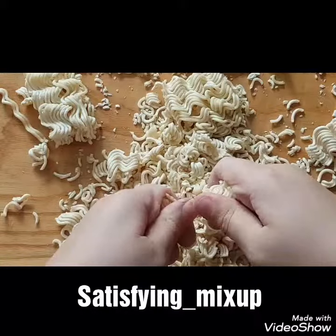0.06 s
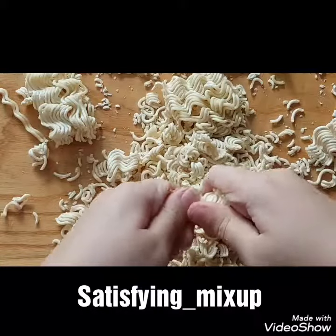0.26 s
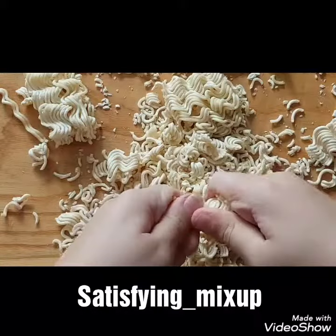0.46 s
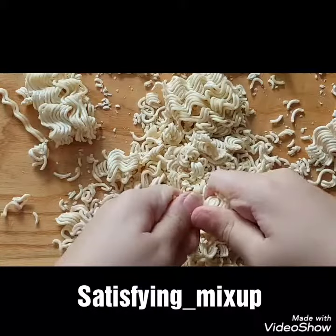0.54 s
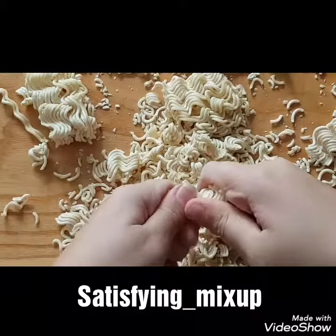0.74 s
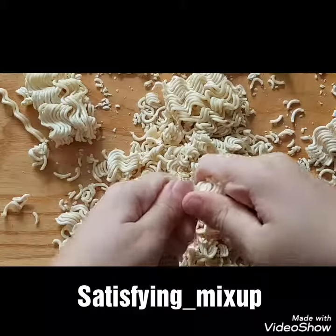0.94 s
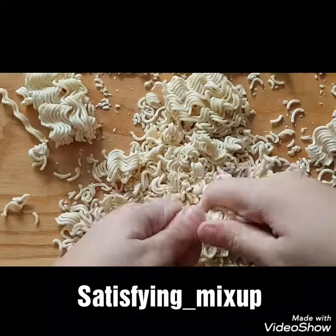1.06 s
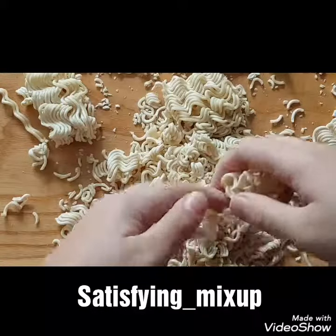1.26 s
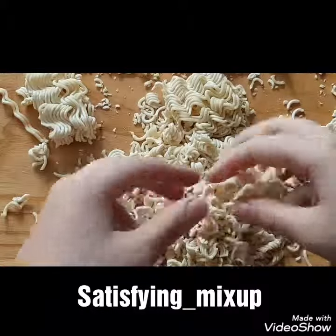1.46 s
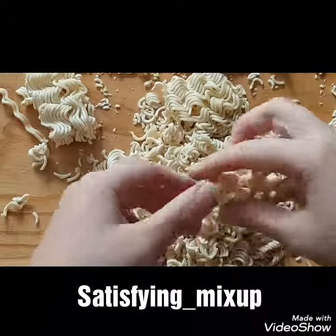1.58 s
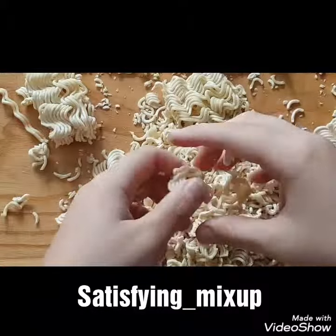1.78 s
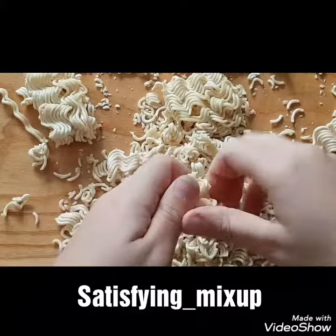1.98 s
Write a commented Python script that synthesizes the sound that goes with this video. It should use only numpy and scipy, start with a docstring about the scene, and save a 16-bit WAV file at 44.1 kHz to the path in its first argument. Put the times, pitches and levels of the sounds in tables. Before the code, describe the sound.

Brittle noodle fractures, bright and clicky with tiny splinters, start with a strong snap and thin out before the first second ends; later fingers rummage in the crumb heap with soft hollow scrapes, close and dry indoors.

```python
"""Dry noodle snaps and crumbs

Fingers snap a piece of dry instant noodle close to a phone, then rummage in the crumbs on a wooden table.
Each fracture is a click that rings briefly, mostly near 3 kHz, and sheds a noise burst of splinters.
Damped sines are thuds of the hands; touches on the heap are scrapes with a low hollow ring.
Random ticks and pings make the rustle; a small quiet room adds a faint tail, low rumble and hiss."""
import sys
import numpy as np
from scipy import signal
from scipy.fft import rfft, irfft
from scipy.io import wavfile

SR = 44100
rng = np.random.default_rng(int(sys.argv[2]) if len(sys.argv) > 2 else 0)


def pcm_store(signal):
    """Save signal as 16-bit PCM."""
    levels = np.round(np.clip(np.atleast_2d(signal), -1, 1) * 32767)
    wavfile.write(sys.argv[1], SR, levels.astype(np.int16).T)


N = 88200  # 2 s
T = np.arange(N) / SR  # s
HZ = np.maximum(np.arange(N // 2 + 1) * SR / N, 1e-3)  # kept above zero for the logarithm


def undb(db):
    """Decibels to gain."""
    return 10 ** (np.asarray(db) / 20)


def unit(x):
    """Scale to a peak of one."""
    return x / np.abs(x).max()


def colour(x, points):
    """Minimum-phase filter of unit power through (f/Hz, level/dB) points."""
    hz, db = np.array(points, float).T
    gain = undb(np.interp(np.log(HZ), np.log(hz), db))
    gain = gain / np.sqrt(np.mean(gain ** 2))
    # Folding the cepstrum onto positive times makes the filter causal
    cepstrum = irfft(np.log(gain), N)
    cepstrum[1:N // 2] *= 2
    cepstrum[N // 2 + 1:] = 0
    impulse = irfft(np.exp(rfft(cepstrum)), N)[:N // 10]
    return signal.fftconvolve(x, impulse)[:N]


def lowpass(x, hz, order):
    """Butterworth low-pass."""
    return signal.sosfilt(signal.butter(order, hz, fs=SR, output="sos"), x)


def resonate(x, hz, q):
    """One resonance, gain 1 at its centre."""
    return signal.lfilter(*signal.iirpeak(hz, q, fs=SR), x)


def add(out, s, x):
    """Mix a sound in at a time in seconds."""
    i = int(round(s * SR))
    out[i:i + len(x)] += x[:N - i]


def burst(decay_s, spread, size):
    """A quickly swelling, then dying run of uneven micro-cracks with a steady total energy."""
    t = T[:size]
    noise, sizes = rng.standard_normal((2, size))
    fade = np.exp(-t / decay_s)
    rise = 1 - np.exp(-t / (0.12 * decay_s))
    cracks = noise * np.exp(spread * sizes) * fade * rise
    return cracks * np.sqrt(np.sum(fade ** 2) / np.sum(cracks ** 2)) / 2


# Spectrum of the room's rumble and hiss: f/Hz, relative level/dB per Hz
FLOOR_SPECTRUM = [(20, -1), (40, -10), (70, -3.5), (100, 0), (140, -5.5), (300, -7.5), (600, -16.5),
                  (1200, -19.5), (3000, -29), (4400, -34), (5500, -33.5), (13000, -41), (16000, -45.5)]
FLOOR_DB, FLOOR_SIDE_DB = -70.5, -19.5  # side is relative to mid


def room_floor():
    """Low rumble and hiss: shaped noise in the middle, plus a weaker one in opposite phase left and right."""
    mid = undb(FLOOR_DB) * colour(rng.standard_normal(N), FLOOR_SPECTRUM)
    side = undb(FLOOR_DB) * colour(rng.standard_normal(N), FLOOR_SPECTRUM)
    return mid + undb(FLOOR_SIDE_DB) * side * np.array([[1], [-1]])


# Spectrum of the room's tail: f/Hz, relative level/dB
ROOM_SPECTRUM = [(100, -3), (500, -6.5), (2000, 2.5), (3000, 1.5), (4300, 0), (5500, -1), (7500, -0.5),
                 (15000, 6)]
ROOM_DB, ROOM_T60_S, ROOM_DELAY_S = -24.5, 0.31, 0.0026


def room(x):
    """A weak, short diffuse tail: the sound convolved with dying noise."""
    decay = np.exp(-np.log(1000) * T / ROOM_T60_S)  # 60 dB down after the T60
    tail = rng.standard_normal(N) * decay * (T > ROOM_DELAY_S)
    tail = colour(tail / np.sqrt(np.sum(tail ** 2)), ROOM_SPECTRUM)
    return undb(ROOM_DB) * signal.fftconvolve(x, tail)[:N]


# Loudness of the crumbs rubbing between the fingers: t/s, level/dB
RUSTLE_LEVEL = [(0, -77.5), (.07, -80), (.11, -68.5), (.14, -87), (.208, -100), (.222, -54.5), (.26, -58),
                (.31, -73), (.40, -78.5), (.435, -63.5), (.48, -73), (.525, -82), (.548, -72), (.61, -86),
                (.90, -77.5), (.98, -82.5), (1.13, -77), (1.20, -71.5), (1.245, -73), (1.29, -74.5),
                (1.33, -69.5), (1.44, -87.5), (1.48, -64), (1.60, -72), (1.70, -70.5), (1.78, -85.5),
                (1.85, -75), (1.91, -83.5), (1.94, -74.5), (2, -67)]
# Spectrum of the dry crumb ticks: f/Hz, relative level/dB
TICK_SPECTRUM = [(150, -4), (400, 5.5), (1000, 2), (1800, -3), (3000, 1), (4300, -3.5), (5500, -9),
                 (7500, -7.5), (13000, -11), (16000, -18.5)]
TICKS_PER_S, PINGS_PER_S = 3000, 260  # average rates
PING_DB, PING_SPREAD_DB = 5, 6  # relative to the ticks
PING_HZ, PING_SPREAD_OCTAVES, PING_FADE_CYCLES = 3015, 0.335, 3


def rustle(size=512):
    """Crumbs between the fingers: dense dry ticks, and loose bits that each ping at their own pitch."""
    ticks = (rng.random(N) < TICKS_PER_S / SR) * rng.standard_normal(N)
    ticks = colour(ticks / ticks.std(), TICK_SPECTRUM)
    pings = np.zeros(N)
    starts = np.flatnonzero(rng.random(N) < PINGS_PER_S / SR)
    variations = np.clip(rng.standard_normal((len(starts), 2)), -2, 2)
    for i, (pitch, strength) in zip(starts, variations):
        cycles = PING_HZ * 2 ** (PING_SPREAD_OCTAVES * pitch) * T[:size]
        envelope = np.exp(-cycles / PING_FADE_CYCLES) * (1 - np.exp(-cycles))
        ping = np.sin(2 * np.pi * cycles) * envelope
        add(pings, i / SR, undb(PING_DB + PING_SPREAD_DB * strength) * ping)
    level_db = np.interp(T, *np.array(RUSTLE_LEVEL).T)
    return (ticks + pings) * undb(level_db)


# Touches on the heap: t/s, hollow ring level/dB, scrape level/dB, crumb pitch f/Hz
TOUCHES_ON_HEAP = [(1.358, -65, -64.5, 2400), (1.394, -54.5, -50, 3400), (1.4591, -44.5, -42, 3870),
                   (1.4643, -65.5, -46.5, 3700), (1.482, -49, -45, 3500), (1.504, -50, -65, 2600),
                   (1.5298, -48, -49, 2430), (1.544, -49, -62, 2500), (1.602, -56.5, -54, 2970),
                   (1.637, -54.5, -62, 2750), (1.669, -65.5, -52.5, 2800), (1.682, -51.5, -64.5, 2500),
                   (1.724, -56.5, -58, 3060), (1.850, -61.5, -61, 3000), (1.8865, -49.5, -50.5, 3990),
                   (1.926, -42.5, -43, 3000), (1.9338, -54.5, -43.5, 2130), (1.969, -49.5, -51, 3300),
                   (1.990, -50.5, -60, 2520)]
# Modes of the low hollow ring: f/Hz, relative level/dB, T60 t/s
HOLLOW_MODES = [(257, -11, 0.089), (316.5, 0, 0.16), (458, -14, 0.12), (511, -12, 0.056), (796, -9, 0.038)]
# Spectrum of the scrapes: f/Hz, relative level/dB
SCRAPE_SPECTRUM = [(60, -20.5), (250, 4), (500, 7.5), (1300, -3.5), (2400, 0.5), (3900, -4), (5500, -8),
                   (7500, -5), (13000, -14.5), (16000, -23)]
HOLLOW_ATTACK_S = 0.0017
SCRAPE_DECAY_S, SCRAPE_SPREAD = 0.0034, 0.58  # spread: unevenness of the micro-cracks
CRUMB_RING_DB, CRUMB_RING_Q = 6.5, 9  # gain relative to the scrape


def touches(size=2048):
    """Fingers bump the heap: a short scrape that rings one crumb, and a low hollow ring."""
    out, scrapes = np.zeros((2, N))
    t = T[:N // 4]
    hollow = np.zeros(len(t))
    for hz, db, t60_s in HOLLOW_MODES:
        decay = np.exp(-np.log(1000) * t / t60_s)
        hollow += undb(db) * np.sin(2 * np.pi * hz * t) * decay
    hollow *= 1 - np.exp(-t / HOLLOW_ATTACK_S)
    for s, hollow_db, scrape_db, crumb_hz in TOUCHES_ON_HEAP:
        scrape = undb(scrape_db) * burst(SCRAPE_DECAY_S, SCRAPE_SPREAD, size)
        crumb = undb(CRUMB_RING_DB) * resonate(scrape, crumb_hz, CRUMB_RING_Q)
        add(out, s, undb(hollow_db) * hollow)
        add(scrapes, s, scrape + crumb)
    return out + colour(scrapes, SCRAPE_SPECTRUM)


# The hands jerk as the piece gives way: t/s, level/dB, f/Hz, decay t/s
HAND_THUDS = [(0.098, -52.5, 80.9, 0.0098), (0.2107, -29, 165.6, 0.0039), (0.217, -40.5, 106, 0.011),
              (.241, -41.5, 399, 0.0019), (.405, -40.5, 385, 0.0011), (.422, -58, 149, 0.0027),
              (0.7286, -41.5, 86, 0.004)]


def thuds():
    """Soft knocks of the hands: heavily damped sines."""
    out, t = np.zeros(N), T[:N // 10]
    for s, db, hz, decay_s in HAND_THUDS:
        thud = np.sin(2 * np.pi * hz * t) * np.exp(-t / decay_s)
        add(out, s, undb(db) * thud)
    return out


EARLY_DB, EARLY_S = -18, 0.0022  # time at which the scatter is densest


def nearby(x, size=1024):
    """Hands, heap and table scatter the sound back within a few milliseconds."""
    t = T[:size] / EARLY_S
    echo = rng.standard_normal(size) * t * np.exp(-t)
    echo = echo / np.sqrt(np.sum(echo ** 2))
    return x + undb(EARLY_DB) * signal.fftconvolve(x, echo)[:N]


# Fractures: t/s, level/dB, ring f/Hz, ring Q, low click level/dB, splinters level/dB
# The last two levels are relative to the first
FRACTURES = [(0.0554, -46, 3230, 4.9, -18, -9.5), (.0637, -32, 3240, 10.7, -34, -2.5),
             (.0964, -46, 3250, 4.4, -18, -5.5), (0.2099, -8, 2550, 5.7, -8.5, -17),
             (0.2117, -16, 2870, 8.5, -14.5, -1.5), (0.218, -35, 2610, 5.3, -12, -12),
             (.2240, -45, 2780, 8.4, -17, -3), (0.2355, -40.5, 2900, 5.4, -22, -4),
             (0.2404, -19, 2830, 1.9, -19.5, -2), (.2514, -26, 3130, 2.7, -17, -7.5),
             (.3161, -49.5, 3320, 2, -23, -4.5), (0.3575, -37.5, 2950, 4, -29, -3.5),
             (0.3728, -42.5, 3220, 3.6, -18, -19), (0.3766, -43.5, 3300, 6.9, -6, -17),
             (0.4042, -24.5, 4000, 1.5, -15.5, -6), (0.4072, -30, 3020, 2.7, -28, -5),
             (.4214, -20, 3140, 3.9, -12.5, -31), (.4372, -40.5, 3230, 3.7, -8, -14),
             (0.4926, -46, 3520, 3, -10, -13), (0.5201, -51.5, 3060, 3.5, -21, -3.5),
             (0.543, -52, 2970, 12, -24, -26), (0.5845, -35, 3770, 1.3, -7.5, -5.5),
             (.6420, -51, 3120, 3.6, -18, 0), (.6837, -21.5, 2850, 5.2, -17.5, -8.5),
             (.6973, -31, 3750, 4, -15, -2.5), (0.6989, -22, 3000, 1.2, -9.5, -9.5),
             (0.7257, -25.5, 2900, 5.9, -7.5, -1.5), (.7270, -19, 3330, 4.9, -20.5, -18),
             (.7670, -24, 3280, 2.5, -10.5, -16), (.8144, -50.5, 3130, 3, -11, -7.5),
             (0.8239, -56.5, 3200, 3, -14, 1), (0.8497, -60.5, 3200, 3, -15, 11),
             (0.862, -63, 3000, 2.7, -12, -5), (0.8798, -46.5, 3030, 4.7, -3.5, -4.5),
             (0.8968, -35, 3054, 11.3, -12, -10), (0.9037, -40.5, 3045, 3.2, -10, -25.5),
             (.9110, -48, 3260, 4, -22, 1), (.9170, -39.5, 3280, 2.8, -15.5, -13.5),
             (1.0221, -47.5, 3000, 6, -9, -26), (1.0521, -47, 2530, 3.3, -16.5, -25),
             (1.095, -52.5, 3280, 4, -26, 1), (1.121, -57.5, 3370, 8, -18, -24),
             (1.1353, -47.5, 3500, 4.6, -21, -6), (1.2307, -44, 2930, 2.7, -3.5, 5),
             (1.2348, -44.5, 2980, 2.2, -0.5, 2), (1.2541, -51, 3000, 3.4, -11.5, 0.5),
             (1.3668, -51, 3000, 1.5, 0, 5.5), (1.5828, -49.5, 3100, 7.1, -19, 0),
             (1.5890, -46, 3000, 10, -24, 1.5), (1.8868, -45.5, 3940, 4.45, -12, 7),
             (1.9334, -43, 2300, 4.5, 2, -24), (1.9707, -46, 3330, 4.4, -11, -19)]
# Spectrum of the splinters: f/Hz, relative level/dB
SPLINTER_SPECTRUM = [(1500, -7.5), (4200, 0), (5500, -5.5), (7300, 1.5), (10000, -5.5), (14000, -3),
                     (16500, -9)]
SPLINTER_DECAY_S, SPLINTER_SPREAD = 0.001, 0.27  # spread: unevenness of the micro-cracks
RING_TOP_HZ, CLICK_TOP_HZ = 4670, 1450  # low-pass corners


def snaps(size=1024):
    """Each fracture is one pulse: a short ring, a dull click and a spray of splinters."""
    out, splinters = np.zeros((2, N))
    pulse = signal.unit_impulse(size)
    click = unit(lowpass(pulse, CLICK_TOP_HZ, order=2))
    for s, db, hz, q, click_db, splinter_db in FRACTURES:
        ring = unit(lowpass(resonate(pulse, hz, q), RING_TOP_HZ, order=5))
        spray = burst(SPLINTER_DECAY_S, SPLINTER_SPREAD, size)
        add(out, s, -undb(db) * (undb(click_db) * click + ring))  # the pulse starts downwards
        add(splinters, s, undb(db + splinter_db) * spray)
    return out + colour(splinters, SPLINTER_SPECTRUM)


LOW_CUT_HZ, TOP_HZ = 83, 16200


def scene():
    """All close sources in the centre, thinned in the deep bass, over the rumble and hiss of the room."""
    near = rustle() + touches() + thuds() + nearby(snaps())
    near = signal.sosfilt(signal.butter(2, LOW_CUT_HZ, "high", fs=SR, output="sos"), near)
    return room_floor() + room(near) + near


def record(dry):
    """The phone cuts the top with a steep elliptic low-pass."""
    return signal.sosfilt(signal.ellip(8, 0.2, 70, TOP_HZ, fs=SR, output="sos"), dry)


dry = scene()
out = record(dry)
pcm_store(out)
```